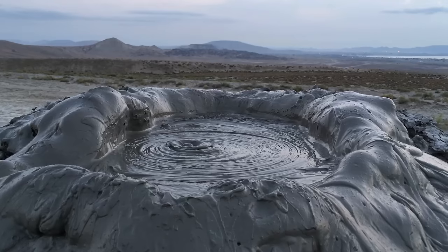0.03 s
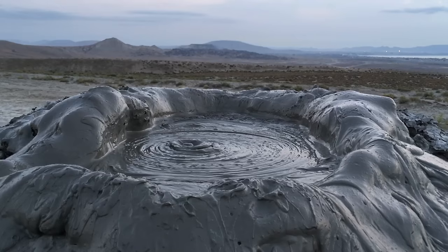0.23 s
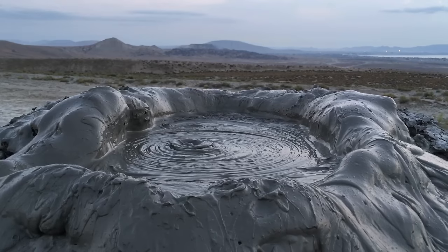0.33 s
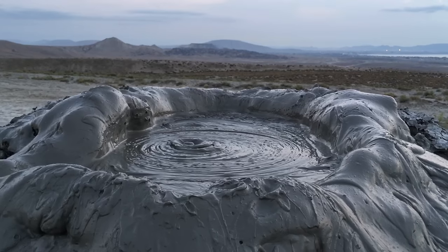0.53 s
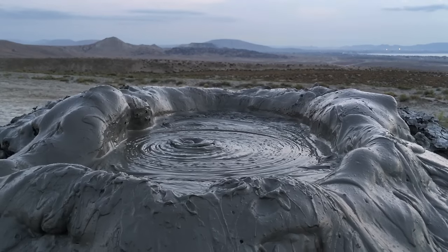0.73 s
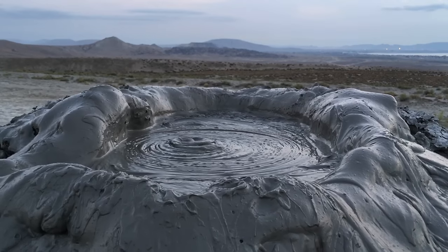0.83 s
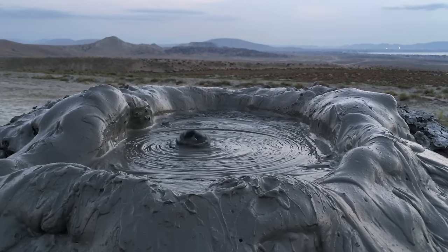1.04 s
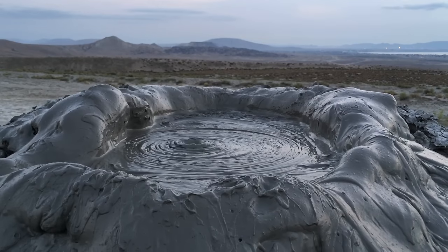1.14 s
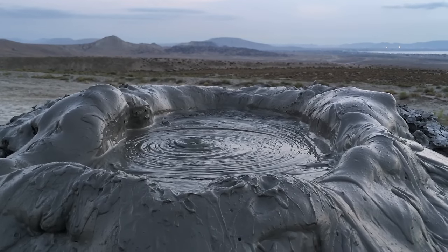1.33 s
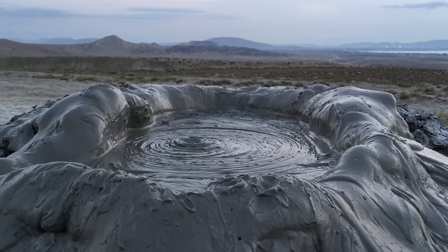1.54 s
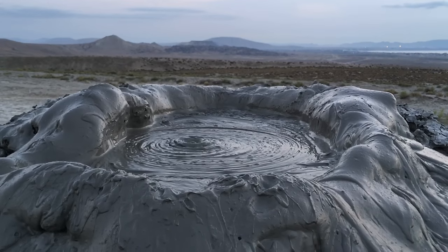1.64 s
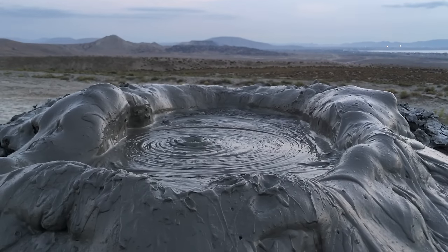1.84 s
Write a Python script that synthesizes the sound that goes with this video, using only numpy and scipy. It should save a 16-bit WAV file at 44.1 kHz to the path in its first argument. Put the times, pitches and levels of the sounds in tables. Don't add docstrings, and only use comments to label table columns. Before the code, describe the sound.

Thick mud bubbling, heard close in open air. Low, uneven heaves and burps grow from 0.15 s, peaking in a heavy bassy blurp near 0.63 s with wet plops and droplet splatter. From 0.75 to 1.2 s it calms to hollow plops and ticks, with a clear snap at 1.14. A tiny bright crack at 1.3, a soft deep thump at 1.42, weak gurgles near 1.7; faint wind rumble and hiss.

```python
import sys
import numpy as np
from scipy import signal
from scipy.io import wavfile

SR = 44100
rng = np.random.default_rng(int(sys.argv[2]) if len(sys.argv) > 2 else 0)


def ratio_of_db(decibels):
    return 10 ** (np.asarray(decibels, float) / 20)


def wav_record(signal):
    frames = np.transpose(np.atleast_2d(signal))
    bounded = np.clip(frames, -1, 1)
    quanta = np.round(bounded * 32767).astype(np.int16)
    wavfile.write(sys.argv[1], SR, quanta)


N = 83790


def rms_one(x):
    return x / np.sqrt(np.mean(x ** 2) + 1e-20)


def drift(rate_hz):
    pole = np.exp(-2 * np.pi * rate_hz * 40 / SR)
    settle = 2000
    white = rng.standard_normal(N // 40 + settle + 2)
    slow = rms_one(signal.lfilter([1], [1, -2 * pole, pole * pole], white)[settle:])
    return np.interp(np.arange(N) / 40, np.arange(len(slow)), slow)


def banded_noise(spectrum, patchy_db, flutter_hz):
    hz, db = np.transpose(spectrum)
    edges_hz = 24 * 2 ** np.arange(0, 9.6, 1 / 3)
    together = drift(flutter_hz)
    white = rng.standard_normal((2, N + SR // 4))
    out = 0
    for k, (low, high) in enumerate(zip(edges_hz, edges_hz[1:])):
        mid = np.sqrt(low * high)
        if hz[0] / 1.1 < mid < hz[-1] * 1.1:
            sos = signal.butter(2, [low, high], "band", fs=SR, output="sos")
            band = signal.sosfilt(sos, white[k % 2])[-N:]
            flicker_db = patchy_db * (0.5 * together + 0.35 * drift(flutter_hz))
            out = out + band * ratio_of_db(np.interp(np.log(mid), np.log(hz), db) + flicker_db)
    return rms_one(out)


def steep_cut(x, cut_hz=15720):
    return signal.sosfilt(signal.ellip(12, .3, 70, cut_hz, fs=SR, output="sos"), x)


def add(out, s, sound):
    i = int(s * SR)
    out[i:i + len(sound)] += sound[:N - i]


# (time [s], level [dB])
CHURN_LEVEL = [(0, -55), (.15, -47), (.3, -55), (.42, -39.5), (.56, -46.5), (.63, -35.5), (.72, -44.5),
               (.8, -60.5), (1.2, -56), (1.36, -57), (1.42, -41), (1.49, -55), (1.661, -56.5), (1.702, -48),
               (1.76, -59), (1.9, -51.5)]
# (frequency [Hz], level [dB])
CHURN_SPECTRUM = [(30, -12), (55, 1.5), (100, 5), (200, -3), (400, -21.5), (600, -46)]


def churn():
    s, db = np.transpose(CHURN_LEVEL)
    level_db = -3 + np.interp(np.arange(N) / SR, s, db)
    return ratio_of_db(level_db) * banded_noise(CHURN_SPECTRUM, patchy_db=1.5, flutter_hz=11.0)


# (frequency [Hz], density [dB per Hz])
HUSH_SPECTRUM = [(28, -8.5), (55, 0), (150, -19.5), (320, -20), (680, -30), (930, -24), (1400, -41),
                 (1800, -56.5)]


def hush():
    return ratio_of_db(-55.5) * banded_noise(HUSH_SPECTRUM, patchy_db=3.5, flutter_hz=21.0)


# (frequency [Hz], width [Hz], level [dB])
HISS_DIPS = [(1850, 270, -4), (4880, 850, -5), (7600, 1400, -4), (10470, 640, -10)]


def dips(x):
    for hz, width_hz, db in HISS_DIPS:
        x = x - (1 - ratio_of_db(db)) * signal.lfilter(*signal.iirpeak(hz, hz / width_hz, fs=SR), x)
    return x


# (frequency [Hz], density [dB per Hz])
HISS_SPECTRUM = [(1200, -2), (1600, -3.5), (2600, -7.5), (3400, -7.5), (7400, -8), (9500, -7), (12000, -6),
                 (16800, -2)]


def hiss():
    noise = banded_noise(HISS_SPECTRUM, patchy_db=0.8, flutter_hz=53.0)
    return ratio_of_db(-71) * dips(steep_cut(noise))


def swells(rows, spread_cycles, sag_per_cycle):
    out = np.zeros(N)
    for s, db, hz in rows:
        even = np.arange(-2 * SR // hz, 2 * SR // hz) * hz / SR
        turn = (1 - np.exp(-sag_per_cycle * even)) / sag_per_cycle
        bell = np.exp(-.5 * (even / spread_cycles) ** 2)
        add(out, s + even[0] / hz, -ratio_of_db(db) * np.sin(2 * np.pi * turn) * bell)
    return out


# (time [s], peak level [dB], frequency [Hz])
HEAVE_EVENTS = [(0.0474, -48, 57.7), (0.1338, -48, 73.5), (0.150, -42, 70), (0.170, -37, 60.5),
                (0.192, -35.5, 62), (0.2069, -38, 53.3), (0.2404, -32, 78.4), (0.2847, -32.5, 62.7),
                (0.305, -46, 64), (0.3366, -38, 63.4), (0.3777, -36, 78.4), (0.4195, -29.5, 99),
                (0.4308, -30.5, 91), (0.454, -36, 106), (0.4635, -27, 85), (0.5142, -36.5, 61),
                (0.5452, -32, 68), (0.6055, -23, 77), (0.6262, -23, 55.4), (0.6747, -29, 66),
                (0.7191, -34.5, 70.5), (0.747, -30.5, 79), (0.7818, -40, 92), (0.8243, -46.5, 58),
                (0.8738, -37.5, 67.4), (0.934, -43, 74), (0.9465, -37, 70.5), (1.0054, -41, 58.3),
                (1.014, -42.5, 69), (1.060, -49.5, 75), (1.118, -48.5, 94), (1.154, -50.5, 54.4),
                (1.176, -47.5, 51), (1.1929, -60, 48.3), (1.252, -48.5, 62.3), (1.332, -52, 77),
                (1.4036, -29.5, 59), (1.4245, -23, 57), (1.4435, -39.5, 52.4), (1.465, -48, 62),
                (1.512, -48, 75.4), (1.582, -50, 66), (1.627, -47.5, 98), (1.6871, -40.5, 47.4),
                (1.723, -45.5, 98), (1.7345, -53, 85), (1.822, -62, 63.4), (1.856, -49.5, 70.4)]


def heaves():
    return swells(HEAVE_EVENTS, spread_cycles=0.47, sag_per_cycle=0.22)


# (time [s], peak level [dB], frequency [Hz])
BURP_EVENTS = [(0.1206, -36.5, 207), (0.1465, -39.5, 183), (0.155, -39.5, 129), (0.21, -35, 212),
               (0.231, -42.5, 207), (0.250, -44, 216), (0.27, -33.5, 247), (0.2771, -29.5, 155.5),
               (0.3335, -34, 93.5), (0.3492, -41.5, 210), (0.4004, -31, 188), (0.4074, -34.5, 122),
               (0.4267, -32.5, 227), (0.441, -39.5, 236), (0.4579, -34, 284), (0.5005, -36, 168),
               (0.5197, -35, 175), (0.5296, -34.5, 234), (0.5563, -30.5, 143), (0.5703, -24, 102.7),
               (0.6013, -31, 154), (0.6113, -31, 191), (0.6263, -14.5, 187), (0.6337, -21.5, 125),
               (0.647, -33.5, 163), (0.6652, -21.5, 246), (0.67, -37, 140), (0.7, -44.5, 296),
               (0.705, -37, 134), (0.7672, -37.5, 100), (0.821, -45, 115), (0.888, -43, 116),
               (1.4054, -34, 128), (1.4144, -30, 118), (1.4145, -35, 183), (1.4239, -38, 135),
               (1.6985, -41, 146), (1.704, -40, 162), (1.777, -51.5, 163), (1.7856, -44, 168),
               (1.792, -48, 168)]


def burps():
    return swells(BURP_EVENTS, spread_cycles=0.45, sag_per_cycle=0.31)


def fronts():
    lead_cycles, pitch_ratio, edge_db, growth_per_db = 0.22, 1.7, -14, 0.72
    rows = []
    for s, db, hz in BURP_EVENTS:
        front_db = db + edge_db + growth_per_db * (db + 21.5)
        rows.append((s - lead_cycles / hz, front_db, hz * pitch_ratio))
    return swells(rows, spread_cycles=0.43, sag_per_cycle=0.31)


def ring(hz, rise_cycles, t60_cycles, sag):
    turn = np.arange(int(40 * SR / hz)) * hz / SR
    shape = (1 - np.exp(-turn / rise_cycles)) * ratio_of_db(-60 * turn / t60_cycles)
    phase_cycles = turn + 2 * sag * (1 - np.exp(-turn / 2))
    return shape / shape.max() * np.sin(2 * np.pi * phase_cycles)


# (time [s], peak level [dB], frequency [Hz])
TICK_EVENTS = [(.436, -68.5, 2320), (.558, -73, 2500), (.594, -71, 2800), (.609, -64.5, 2350),
               (.619, -67, 2400), (.634, -69, 2420), (.674, -71, 2520), (.681, -64, 2300),
               (.685, -64, 2400), (.693, -68, 2490), (.703, -67, 2600), (.717, -67, 2500),
               (.706, -62.5, 3970), (.707, -74, 3200), (0.7435, -62.5, 2620), (.748, -72, 2650),
               (.7735, -66, 2700), (.793, -63, 2200), (.796, -62, 2730), (0.8184, -57, 2530),
               (0.818, -66, 3650), (0.8448, -57.5, 2450), (.8450, -62, 4550), (.847, -62, 6000),
               (.850, -66, 5900), (.861, -60, 6100), (.862, -76, 6900), (.901, -67, 1780),
               (.902, -68, 3400), (.984, -65, 3700), (.985, -66, 2500), (0.997, -64, 2500),
               (1.012, -63.5, 2430), (1.012, -66, 3370), (1.054, -66, 4300), (1.055, -65, 5800),
               (1.0715, -58, 2600), (1.073, -61, 3600), (1.077, -62, 2300), (1.077, -69, 3700),
               (1.0805, -60, 5400), (1.090, -65, 2400), (1.105, -68, 4200), (1.1258, -61, 9000),
               (1.1311, -59, 9400), (1.1358, -52.5, 4220), (1.1367, -61, 3500), (1.1382, -53, 2740),
               (1.1392, -44.5, 2084), (1.143, -61, 2070), (1.146, -59, 8600), (1.1489, -47.5, 5470),
               (1.149, -58, 7600), (1.187, -61, 3300), (1.187, -62, 2400), (1.198, -64, 5640),
               (1.198, -72, 2400), (1.208, -67, 2600), (1.622, -66, 2660)]


def ticks():
    out = np.zeros(N)
    snap_fade = np.exp(-np.arange(96) / 57.0)
    for s, db, hz in TICK_EVENTS:
        add(out, s, ratio_of_db(db) * ring(0.925 * hz, rise_cycles=.9, t60_cycles=22, sag=.24))
        sos = signal.butter(1, [0.28 * hz, min(2.2 * hz, .4 * SR)], "band", fs=SR, output="sos")
        snap = signal.sosfilt(sos, 2 * rng.standard_normal(96) * snap_fade)
        add(out, s, ratio_of_db(db - 11) * snap)
    return out


# (time [s], peak level [dB], frequency [Hz])
PLOP_EVENTS = [(.538, -60, 940), (.557, -60, 1570), (.570, -60, 950), (0.579, -61, 1370),
               (0.587, -56, 1190), (.594, -53.5, 1470), (0.594, -62, 1020), (0.609, -57, 990),
               (.618, -60, 1690), (.633, -64, 1510), (0.665, -53, 1460), (.664, -57, 960),
               (.666, -72, 1850), (.680, -64, 1640), (.689, -60, 1500), (.741, -60.5, 950),
               (0.7447, -64, 2530), (.7935, -50, 854), (.881, -56, 917), (.972, -60.5, 910),
               (0.984, -63, 1460), (1.012, -69, 1460), (1.020, -65, 1410), (1.053, -61, 1020),
               (1.0563, -48, 957), (1.061, -60, 1040), (1.0735, -57, 664), (1.075, -61, 1500),
               (1.0777, -50, 1120), (1.207, -65, 1500), (1.224, -53, 890), (1.241, -64.5, 1370),
               (1.299, -70, 800), (1.425, -53.5, 966), (1.686, -58.5, 860)]


def plops():
    out = np.zeros(N)
    for s, db, hz in PLOP_EVENTS:
        add(out, s, ratio_of_db(db) * ring(hz, rise_cycles=2, t60_cycles=20, sag=0.0011))
        add(out, s, ratio_of_db(db - 8) * ring(hz * 1.15, rise_cycles=2, t60_cycles=20, sag=0.0049))
    return out


# (frequency [Hz], level [dB], t60 [s])
CRATER_BANDS = [(766, 8, 0.0055), (1120, -17, 0.006), (1490, -7, 0.016), (1608, -8, 0.03),
                (2400, -16, 0.021), (2606, -13, 0.027), (3600, -20, 0.013), (5440, -21, 0.002)]


def crater(clicks):
    out = 0
    for hz, db, t60_s in CRATER_BANDS:
        pole, w = ratio_of_db(-60 / (t60_s * SR)), 2 * np.pi * hz / SR
        strikes = ratio_of_db(db) * rng.standard_normal(N) * clicks + 1e-18
        out = out + signal.lfilter([0, np.sin(w)], [1, -2 * pole * np.cos(w), pole * pole], strikes)
    return out


# (time [s], length [s], level [dB])
SPLATTER_RUNS = [
    (0.553, 0.091, -68.5),
    (0.664, 0.018, -71),
    (0.669, 0.051, -73.5),
    (0.744, 0.14, -76),
    (0.937, 0.26, -83),
    (1.071, 0.008, -60),
    (1.13, 0.16, -84),
    (1.37, 0.079, -77),
]


def splatter():
    drops_per_s, spread_db = 600, 3.5
    t, run = np.arange(N) / SR, np.zeros(N)
    for s, length_s, db in SPLATTER_RUNS:
        run = run + ratio_of_db(db) * np.sin(np.pi * np.clip((t - s) / length_s, 0, 1)) ** .5
    hits = rng.random(N) < drops_per_s / SR
    clicks = run * hits * ratio_of_db(spread_db * np.minimum(rng.exponential(1, N), 4))
    for s, db, hz in TICK_EVENTS + PLOP_EVENTS:
        clicks[int(s * SR)] += ratio_of_db(min(db, -60.0) - 6.0)
    return crater(clicks)


# (time [s], peak level [dB], low edge [Hz], t60 [s])
SPIT_EVENTS = [
    (.850, -59, 5000, .008),
    (.8595, -57, 2500, .018),
    (1.2977, -55, 9500, .012),
    (1.3002, -53, 11500, .017),
]
# (time [s], peak level [dB], frequency [Hz])
CRACK_EVENTS = [
    (1.2972, -39, 11500),
    (1.2972, -41, 13300),
    (1.2972, -42, 15400),
    (1.3001, -45, 12300),
    (1.3002, -43, 14400),
]


def spits():
    out, t = np.zeros(N), np.arange(2000) / SR
    for s, db, low_hz, t60_s in SPIT_EVENTS:
        sos = signal.butter(4, [low_hz, 15600], "band", fs=SR, output="sos")
        bright = rms_one(signal.sosfilt(sos, rng.standard_normal(2000)))
        rise = (1 - np.exp(-t / .0003)) ** 2
        add(out, s, bright * rise * ratio_of_db(db - 60 * t / t60_s))
    for s, db, hz in CRACK_EVENTS:
        add(out, s, ratio_of_db(db) * ring(hz, rise_cycles=5, t60_cycles=16, sag=0))
    return out


def scene():
    background = churn() + hush() + hiss()
    small = steep_cut(ticks() + plops() + splatter()) + spits()
    mud = heaves() + burps() + fronts() + small
    return (mud + background)[None]


def top_cut(x):
    return signal.sosfilt(signal.butter(12, 16630, fs=SR, output="sos"), x)


def record(dry):
    bass = signal.butter(3, 24, "high", fs=SR, output="sos")
    top = signal.cheby2(14, 60, 16850, fs=SR, output="sos")
    mix = signal.sosfilt(top, signal.sosfilt(bass, dry))
    return top_cut(mix)


dry = scene()
out = record(dry)
wav_record(out)
```